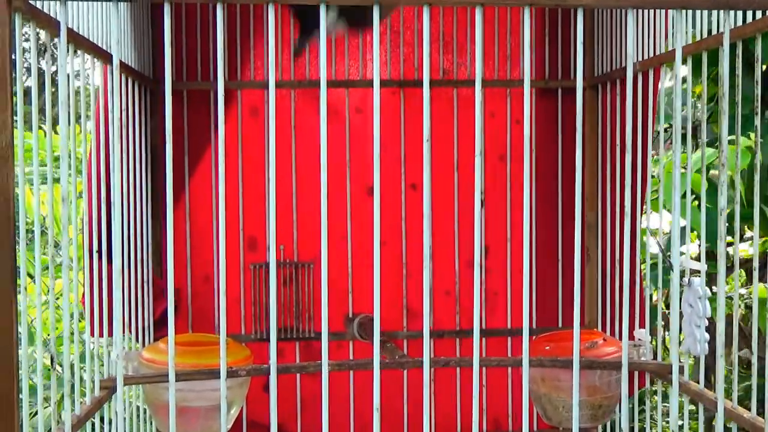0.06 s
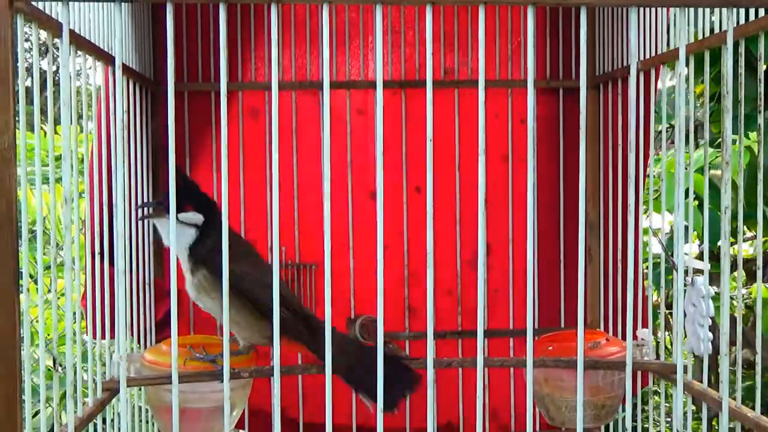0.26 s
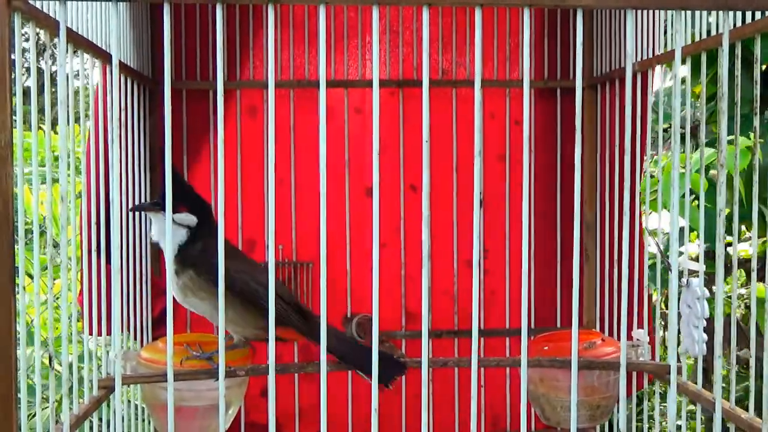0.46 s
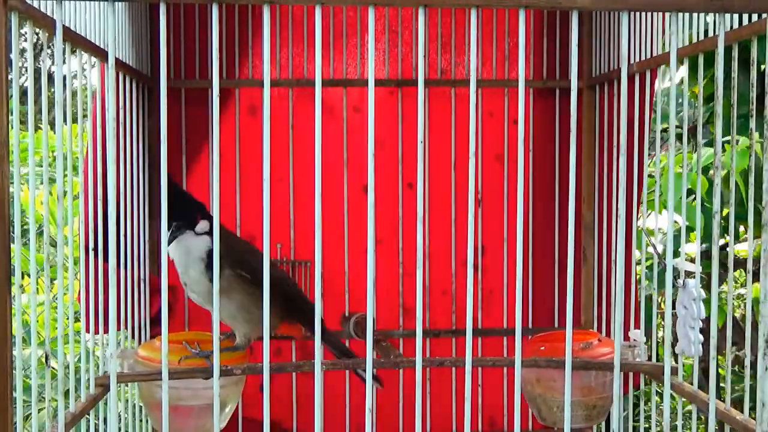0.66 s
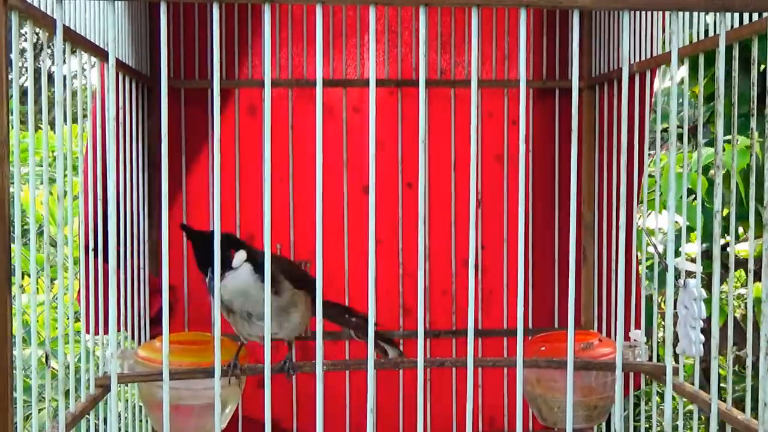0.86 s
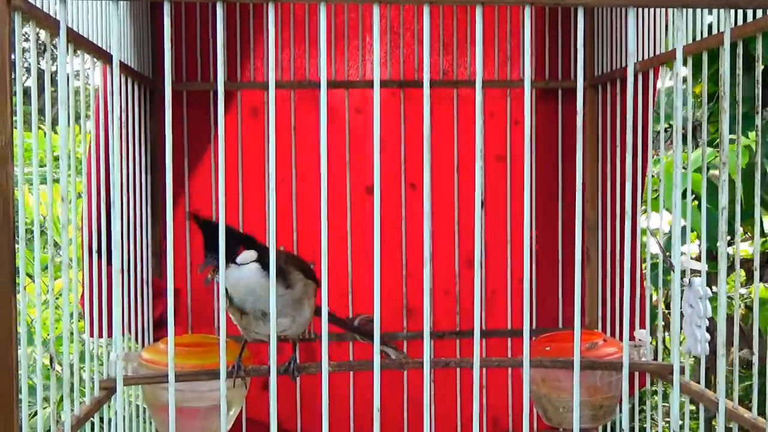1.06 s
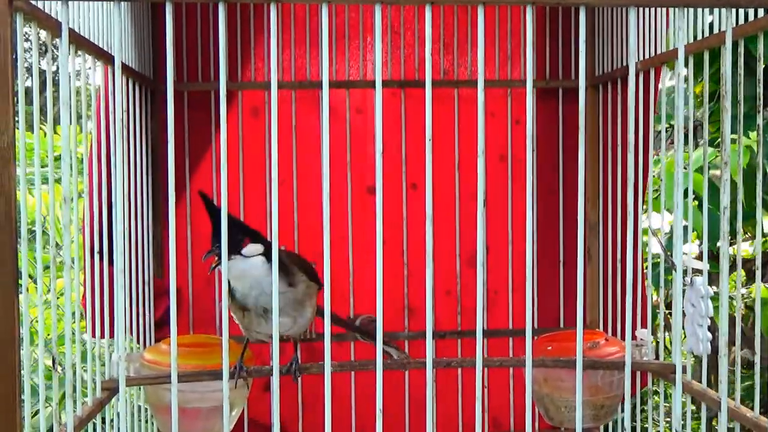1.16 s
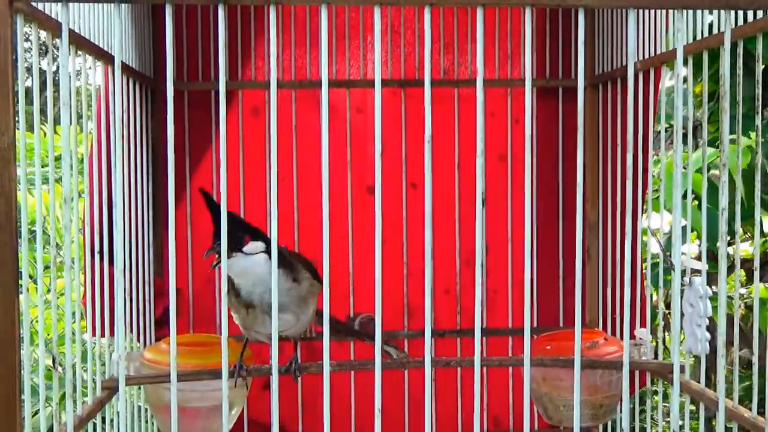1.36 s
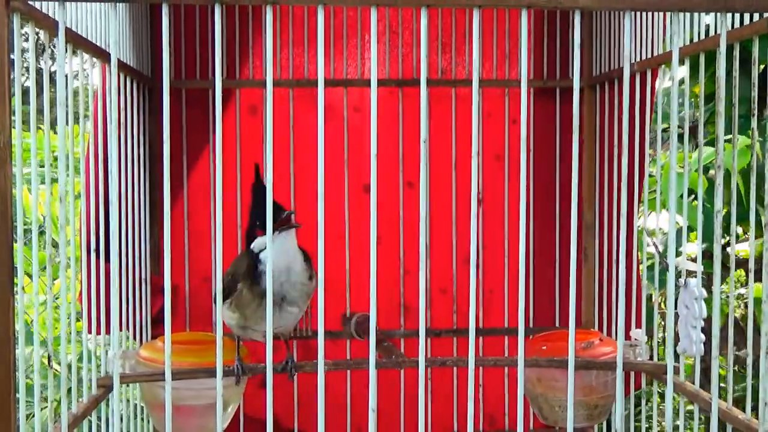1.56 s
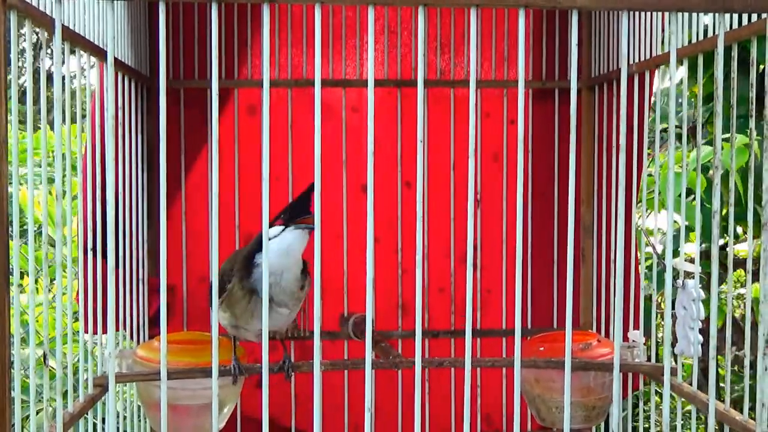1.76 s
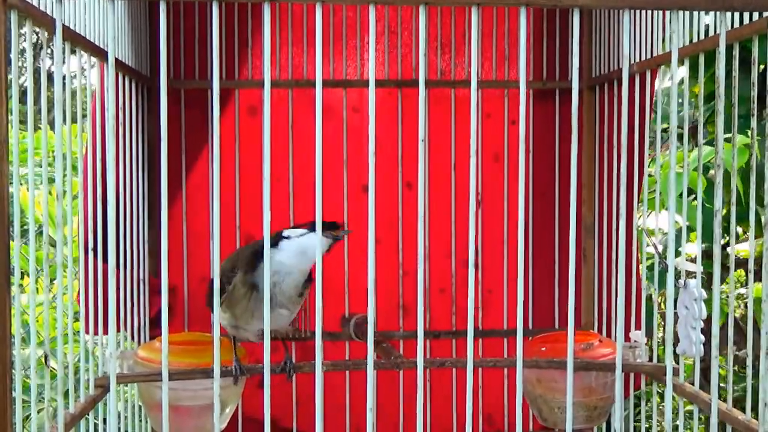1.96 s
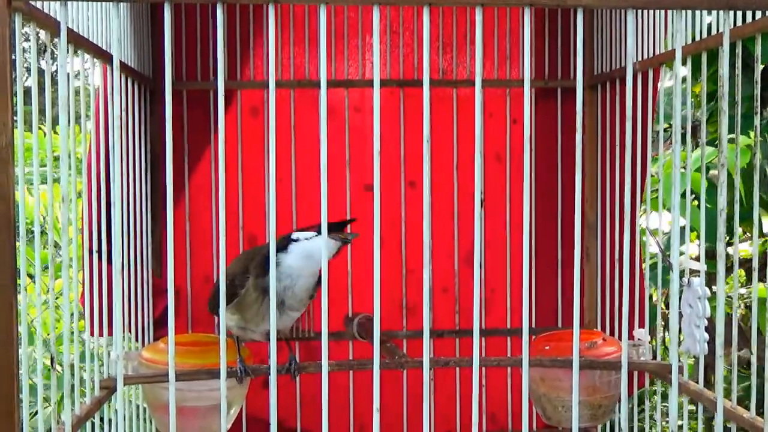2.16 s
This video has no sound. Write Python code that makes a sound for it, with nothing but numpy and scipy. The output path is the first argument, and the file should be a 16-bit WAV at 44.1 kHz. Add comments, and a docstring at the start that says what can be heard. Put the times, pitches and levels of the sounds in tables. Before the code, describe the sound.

Sharp four-note songbird whistle up close, with feather rustle, perch thud and small claw ticks

```python
"""A caged bulbul sings four loud whistled notes: fluttering sine sweeps with raspy overtones.
It flutters down to its perch first and hops after: noise swells for wings, thuds and ticks for feet.
Behind it lie a garden's low rumble and a steady insect trill, all made from coloured noise.
The close microphone's gain control ducks the garden under every note and recovers slowly."""
import sys
import numpy as np
from scipy import signal
from scipy.fft import rfft, irfft, next_fast_len
from scipy.io import wavfile
from scipy.ndimage import uniform_filter1d, map_coordinates

SR = 44100
rng = np.random.default_rng(int(sys.argv[2]) if len(sys.argv) > 2 else 0)


def output_pcm(signal):
    """Save a mono or channel-first signal as 16-bit PCM at the path in sys.argv[1].

    Samples are clipped to [-1, 1] before scaling.
    """
    pcm = np.clip(np.atleast_2d(signal).T, -1, 1) * 32767
    wavfile.write(sys.argv[1], SR, np.round(pcm).astype(np.int16))


N = 97020  # samples


def amp(db):
    """Decibels to gain."""
    return 10 ** (np.asarray(db) / 20)


def unit(x):
    """Scale to rms 1."""
    return x / np.sqrt(np.mean(x ** 2) + 1e-20)


def clock():
    """Time of every sample in seconds."""
    return np.arange(N) / SR


def wobble(rate):
    """A smooth random curve through `rate` random knots a second."""
    knots = rng.standard_normal(int(N * rate / SR) + 4)
    return map_coordinates(knots, [clock() * rate])


def filtered(x, response):
    """Shape x by a response given as a function of frequency."""
    m = next_fast_len(N + SR // 2)  # padded so that tails do not wrap round
    return irfft(rfft(x, m) * response(np.fft.rfftfreq(m, 1 / SR)), m)[..., :N]


def noise(spectrum):
    """Noise of rms 1, coloured by (f/Hz, level/dB) points joined on a log frequency axis."""
    f, db = np.transpose(spectrum)
    colour = lambda hz: amp(np.interp(np.log(hz + 1), np.log(f), db))
    return unit(filtered(rng.standard_normal(N), colour))


def strike(s, rise, t60):
    """An exponential swell up to time s, then an exponential decay of 60 dB in t60."""
    t = clock() - s
    swell = np.minimum(t, 0) / rise
    decay = np.log(1000) * np.maximum(t, 0) / t60
    return np.exp(swell - decay)


def ring(modes, s, rise):
    """Decaying sines, one for each resonant mode, struck at time s."""
    t = clock() - s
    return sum(amp(db) * strike(s, rise, t60) * np.sin(2 * np.pi * hz * t) for hz, db, t60 in modes)


def strokes(rows, spectrum, grain_db):
    """Bell-shaped swells of grainy noise."""
    swell = sum(amp(db) * np.exp(-((clock() - s) / half) ** 2) for s, db, half in rows)
    return swell * unit(noise(spectrum) * amp(grain_db * wobble(260)))


def panned(x, db):
    """Stereo, with the left side db louder than the right."""
    return x * amp(np.array([[db], [-db]]) / 2)


# tone colour of the rumble: f/Hz, level/dB
RUMBLE_COLOUR = [(20, -31.5), (40, -10.5), (75, -1), (130, -0.5), (180, -6), (300, -7), (600, -11),
                 (1000, -16), (1600, -22.5), (3000, -26.5), (4300, -28.5), (5400, -30), (6300, -27.5),
                 (8000, -34.5), (12000, -37), (15500, -43.5)]
# slow swell of the rumble: t/s, level/dB
RUMBLE_SWELL = [(0, -0.5), (.7, .5), (1.3, 0.06), (1.7, .5), (2.05, 0), (2.15, 0)]
# narrow bands, a far hum, a thin tone and the insects: f/Hz, spread to each side/Hz, level/dB
DRONES = [(236.6, 12, -57), (2320, 9, -67.5), (4747, 120, -58.5)]
# stereo lean of the garden: f/Hz, left minus right level/dB
GARDEN_LEAN = [(60, 1.5), (180, 2.5), (550, 3.5), (1650, 1.0), (4970, 0.0), (15000, -0.5)]
RUMBLE_DB, RUMBLE_SWAY_DB = -46, 1.32
SIDE_DB = -22  # opposite-phase noise, relative to the rumble


def garden():
    """Swaying low noise plus narrow noise bands for hum, tone and insects; the lows lean left."""
    sway = RUMBLE_SWAY_DB * wobble(11.93)
    swell = np.interp(clock(), *np.transpose(RUMBLE_SWELL))
    bed = noise(RUMBLE_COLOUR) * amp(RUMBLE_DB + swell + sway)
    for centre, width, db in DRONES:
        band = lambda hz: np.exp(-.5 * ((hz - centre) / width) ** 2)
        bed += amp(db) * unit(filtered(rng.standard_normal(N), band))
    side = amp(RUMBLE_DB + SIDE_DB) * noise(RUMBLE_COLOUR)
    lean = lambda hz: amp(np.outer([.5, -.5], np.interp(hz, *np.transpose(GARDEN_LEAN))))
    return filtered(bed, lean) + np.array([side, -side])


# soft puffs of air as the bird moves: t/s, level/dB, half length/s
PUFFS = [(.02, -55, 0.16), (.36, -45, 0.031), (.512, -44, 0.034), (1.425, -52, .025), (1.43, -52, 0.11),
         (1.745, -52.5, 0.015)]
# tone colour of moving air: f/Hz, level/dB
AIR_COLOUR = [(60, -15), (400, -1), (850, -3.5), (1400, -5), (2800, -12), (5000, -25), (15000, -32.5)]


def puffs():
    """Air pushed by the moving bird: soft swells of dull noise."""
    return strokes(PUFFS, AIR_COLOUR, grain_db=1.0)


# strokes of rustling feathers: t/s, level/dB, half length/s
RUSTLES = [(.072, -50, 0.04), (.175, -43.5, 0.032), (.235, -40.5, .03), (.295, -38, .03),
           (.347, -47, 0.022), (.777, -50.5, .012)]
# tone colour of feathers: f/Hz, level/dB
FEATHER_COLOUR = [(200, -3), (1500, -4), (4000, -3.5), (7000, -0.5), (11500, -5), (15000, -10.5)]


def feathers():
    """Feathers brushing past each other: swells of bright, grainy noise."""
    return strokes(RUSTLES, FEATHER_COLOUR, grain_db=3)


# feet landing on the perch: t/s, level/dB
LANDINGS = [(.197, -24.5)]
# tone colour of the impact: f/Hz, level/dB
THUD_COLOUR = [(30, -8), (70, -3), (400, 2.5), (1100, -10.5), (1400, -2.5), (1700, -10), (3800, -15),
               (6500, -11), (11000, -13.5), (15000, -24)]
# low modes of perch and cage: f/Hz, level/dB, decay t60/s
PERCH_MODES = [(42, -25.5, 0.26), (129.3, -21, .13), (246.8, -18.5, 0.035), (390, -12.5, 0.043)]
THUD_RISE_S, THUD_T60_S = 0.0016, .04


def landing():
    """The impact is a short noise burst that sets the low modes of perch and cage ringing."""
    thud = noise(THUD_COLOUR)
    out = np.zeros(N)
    for s, db in LANDINGS:
        burst = thud * strike(s, THUD_RISE_S, THUD_T60_S)
        out += amp(db) * (burst + ring(PERCH_MODES, s, THUD_RISE_S))
    return out


# claws on perch and bars: t/s, level/dB, rise/s, decay t60/s, wire ring level/dB
TICKS = [(0.2297, -35.5, 0.00059, 0.028, -24), (.2535, -28.5, 0.00089, .025, -31),
         (.3125, -41, .001, 0.023, -24), (.3235, -44, 0.0011, 0.015, -25), (0.7896, -17, .0004, .02, -24.5),
         (.819, -21, .0004, .018, -21.5), (.829, -24, .0025, .025, -5), (.917, -47, .005, .05, -4)]
# tone colour of a claw scratch: f/Hz, level/dB
CLAW_COLOUR = [(300, -29), (1200, -21.5), (3300, -23.5), (4300, -14.5), (5500, -9), (8800, -3),
               (11500, -4.5), (15000, -14)]
# modes of the cage wire: f/Hz, level/dB, decay t60/s
WIRE_MODES = [(6420, 1, 0.035), (8620, -9.5, 0.067)]
SCRATCH_GRAIN_DB = 3


def claws():
    """Each tick is a burst of grainy scratch noise that rings the wire."""
    grain = amp(SCRATCH_GRAIN_DB * wobble(1500))
    scratch = unit(noise(CLAW_COLOUR) * grain)
    out = np.zeros(N)
    for s, db, rise, t60, ring_db in TICKS:
        wire = amp(ring_db) * ring(WIRE_MODES, s, rise)
        out += amp(db) * (scratch * strike(s, rise, t60) + wire)
    return out


# one whistle curve per note, two upslurs, a step up, a held note that falls: t/s, f/Hz, level/dB
NOTES = [
    [(.238, 2830, -27), (.241, 3150, -18.5), (.244, 2674, -27), (.248, 2774, -9), (.262, 2970, -1),
     (.277, 3650, -4.5), (.289, 3876, 3), (.297, 3670, -0.5), (.301, 3700, -17)],
    [(.380, 2860, -9.5), (.386, 2606, -10.5), (.398, 2840, -3), (.411, 3143, -3.5), (.423, 3663, 2),
     (.433, 3770, 0), (.441, 3630, -5.5), (.447, 3550, -20)],
    [(.516, 2014, -26.5), (.520, 2300, -21), (.526, 2113, -6), (.537, 2230, -7.5), (.546, 1976, -17.5),
     (.551, 2833, 1), (.562, 3099, 0.5), (.576, 3067, 1), (.582, 2760, -14)],
    [(.640, 2230, -35), (.650, 2326, -9), (.662, 2351, -6), (.688, 2374, -2), (.699, 2383, -10.5),
     (.707, 2126, -11), (.724, 1984, -15), (.751, 1923, -19), (.759, 1760, -29)],
]
# one row per note: flutter depth/Hz, pitch jitter/share, overtone level/dB,
# overtone growth/dB per dB of whistle, overtone phase roughness/rad, half-pitch level/dB
VOICING = [(130, .008, 2, 1.5, .7, -59), (110.7, 0.0027, -1.5, 1.85, .7, -65),
           (45, 0.015, -5, 0.44, .9, -56), (6, .003, -1.5, 0.5, 0.45, -47.5)]
# harmonics 2 to 7: level/dB
OVERTONES_DB = [-31.5, -38.5, -41.5, -46, -41, -51]
# partials at 0.5, 1.5, 2.5 .. times the pitch: level/dB
HALF_TONES_DB = [-3.5, 2, -18, -16, -20, -17.5]
# beak's colouring of the overtones: f/Hz, level/dB
BEAK_COLOUR = [(1000, -1.5), (4500, -3.5), (5700, -3.5), (7200, -0.5), (11500, 4.5), (13000, -16),
               (14300, -7.5), (15000, -39)]
FLUTTER_HZ, FLUTTER_FADE_S = 176.4, .042
FLUTTER_DB_PER_HZ = 0.03  # the level flutters along with the pitch
RASP_DB = 2.5  # random flicker of each overtone
EDGE_S = 0.0017  # extra time at each end of a note; the fades last twice this


def song():
    """A nearly pure whistle whose fast flutter dies away, with raspy overtones and a trace of half pitch."""
    t, out = clock(), np.zeros(N)
    for note, (depth_hz, jitter, bright_db, growth, rough, half_db) in zip(NOTES, VOICING):
        s, hz, db = np.transpose(note)
        on = (t > s[0] - EDGE_S) & (t < s[-1] + EDGE_S)
        u = t[on]

        since = u - s[0]
        fade = np.exp(-.5 * (since / FLUTTER_FADE_S) ** 2)
        flutter = depth_hz * np.sin(2 * np.pi * FLUTTER_HZ * since) * fade
        pitch = np.interp(u, s, hz) * (1 + jitter * wobble(500)[on]) + flutter
        level = np.interp(u, s, db) + FLUTTER_DB_PER_HZ * flutter
        phase = 2 * np.pi * np.cumsum(pitch) / SR

        upper = np.zeros(len(u))
        for k, own_db in enumerate(OVERTONES_DB, 2):
            beak_db = np.interp(k * pitch, *np.transpose(BEAK_COLOUR))
            gain = amp(bright_db + own_db + beak_db + RASP_DB * wobble(300)[on])
            upper += gain * np.sin(k * phase + rough * wobble(450)[on])
        for k, own_db in enumerate(HALF_TONES_DB):
            gain = amp(half_db + own_db + RASP_DB * wobble(90)[on])
            upper += gain * np.sin((k + .5) * phase)

        to_edge = np.minimum(u - u[0], u[-1] - u)
        gate = np.sin(np.pi / 2 * np.clip(to_edge / (2 * EDGE_S), 0, 1)) ** 2
        voice = amp(level) * np.sin(phase) + amp(growth * level) * upper
        out[on] += np.sqrt(2) * gate * voice  # a sine at 0 dB gets rms 1
    return out


# nearby surfaces: delay t/s, level/dB
WALLS = [(.0031, -21.5), (.0058, -20), (0.0121, -19), (.024, -27.5)]
# tone colour of the tail: f/Hz, level/dB
TAIL_COLOUR = [(1000, -5.5), (2200, -8), (3000, 0.5), (4200, -2.5), (6000, -11), (15000, -18.5)]
TAIL_DB, TAIL_T60_S, TAIL_RISE_S = -27.5, 0.25, 0.0081


def surroundings(x):
    """Close surfaces return delayed copies; a decaying noise tail stands for the outdoor reverb."""
    t = clock()[:SR // 2]
    decay = np.exp(-np.log(1000) * t / TAIL_T60_S) * (1 - np.exp(-t / TAIL_RISE_S))
    tail = rng.standard_normal(len(t)) * decay
    tail /= np.linalg.norm(tail)
    echoes = lambda hz: sum(amp(db) * np.exp(-2j * np.pi * hz * delay) for delay, db in WALLS)
    tail_colour = lambda hz: amp(TAIL_DB + np.interp(hz, *np.transpose(TAIL_COLOUR)))
    early = filtered(x, echoes)
    late = signal.fftconvolve(filtered(x, tail_colour), tail)[:N]
    return x + early + late


def scene():
    """The garden behind, the bird just left of centre."""
    background = garden()
    bird = puffs() + feathers() + landing() + claws() + song()
    return background + panned(surroundings(bird), 1)  # dB


def released(over_db, db_per_s):
    """Hold each peak and let it go at a steady rate."""
    fall = db_per_s * clock()
    return np.maximum.accumulate(over_db + fall) - fall


LIMIT_DB, ATTACK_S = -13, .004  # threshold and averaging time of the gain control
FAST_DB_PER_S, SLOW_DB_PER_S = 419, 3  # release rates
SLOW_SHARE = 0.35  # part of each cut that lingers
TOP_HZ = 15900


def record(dry):
    """Gain control with a fast and a slow release on the whole mix, then the band limit."""
    span = round(ATTACK_S * SR)
    power = np.abs(uniform_filter1d(dry.mean(0) ** 2, size=span))  # abs guards against rounding
    over_db = np.maximum(10 * np.log10(power + 1e-12) - LIMIT_DB, 0)
    fast_db = released(over_db, FAST_DB_PER_S)
    slow_db = released(SLOW_SHARE * over_db, SLOW_DB_PER_S)
    cut_db = uniform_filter1d(np.maximum(fast_db, slow_db), size=span)
    return filtered(dry * amp(-cut_db), lambda hz: hz < TOP_HZ)


dry = scene()
out = record(dry)
output_pcm(out)
```